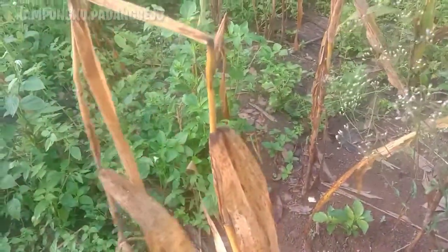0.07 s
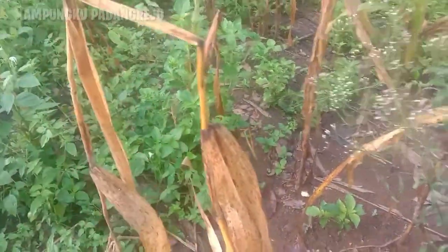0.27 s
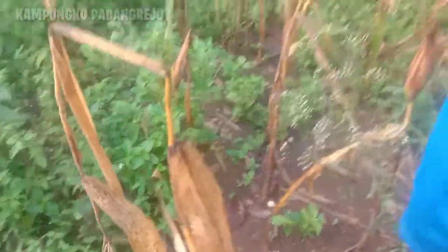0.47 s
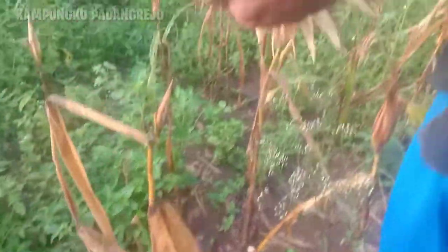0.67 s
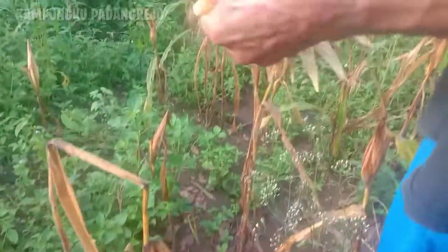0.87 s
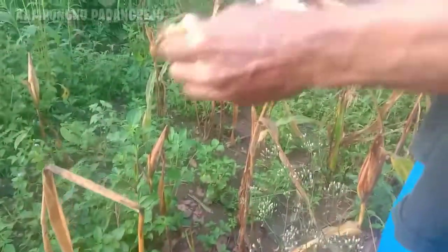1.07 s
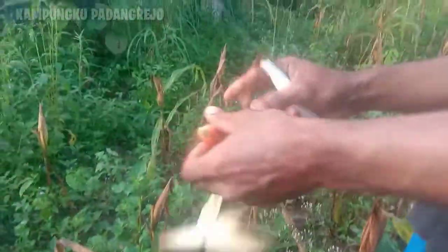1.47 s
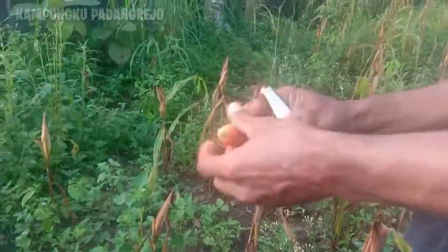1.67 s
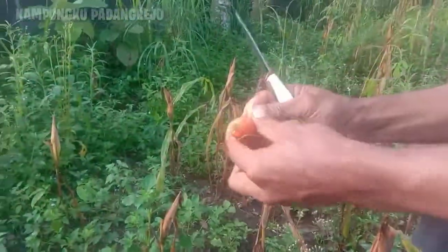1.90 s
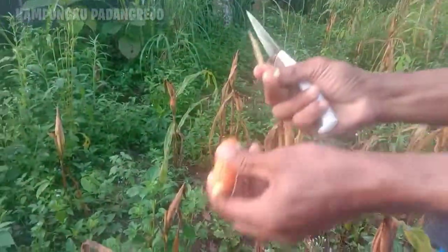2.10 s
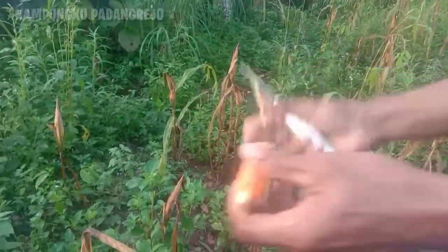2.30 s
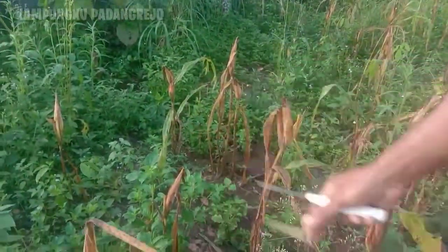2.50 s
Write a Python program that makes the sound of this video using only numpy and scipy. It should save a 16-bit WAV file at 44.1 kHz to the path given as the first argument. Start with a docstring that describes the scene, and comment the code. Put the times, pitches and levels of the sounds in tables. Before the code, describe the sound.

Dry corn husk is torn close up in a field, crackling from about 0.3 seconds. The loudest crack comes at 0.75 as the stalk gives, with another sharp snap at 1.0. A smaller snap and splintering tear follow around 1.7, then light knife ticks and sliding husk near 2.0. Behind are faint falling bird whistles, insects, a distant dove and fowl, and low microphone handling rumble.

```python
"""Dry corn husk, torn and snapped off a cob by hand, close up in a field.
Fibres break in sharp cracks and splinters, the stalk rings, leaves crackle and slide, a knife ticks.
A small bird whistles downward, insects shrill, a dove and a fowl call far off.
Under it: outdoor air and the rumble of a hand-held microphone."""
import sys
import numpy as np
from scipy import signal
from scipy.fft import rfft, irfft, next_fast_len
from scipy.io import wavfile

SR = 44100
rng = np.random.default_rng(int(sys.argv[2]) if len(sys.argv) > 2 else 0)


def dump(signal):
    """Clip the signal to [-1, 1] and save it as 16-bit WAV at the path in sys.argv[1]."""
    limited = np.clip(np.atleast_2d(signal).T, -1, 1)
    pcm = np.round(limited * 32767).astype(np.int16)
    wavfile.write(sys.argv[1], SR, pcm)


N = 116865
T = np.arange(N) / SR
GRID_HZ = np.fft.rfftfreq(4096, 1 / SR)
FIBRE_PEAK_DB, FIBRE_WIDTH_HZ = 10, 380

# Microphone port resonances: f/Hz, width/Hz, gain/dB
PORT_PEAKS = [(1270, 140, 6.5), (1850, 150, -3), (2300, 200, 2), (3000, 200, -2), (3750, 200, 2),
              (5850, 250, 3), (6570, 120, -4), (7350, 350, 4), (12700, 1200, -4), (15050, 500, 10)]
# Air envelope: t/s, level/dB
AIR_LEVEL = [(0, -56), (.25, -58), (.65, -62.5), (1.1, -58), (1.45, -62.5), (1.7, -58), (2.05, -60.5),
             (2.4, -58.5), (2.65, -60.5)]
# Air spectrum: f/Hz, level/dB
AIR_SPECTRUM = [(20, 19.5), (80, 7.5), (200, 14), (330, -0.5), (550, -5), (900, -12), (1300, -5),
                (2200, -14), (3000, -12), (4500, -17.5), (7000, -31.5), (9500, -15.5), (11000, -25),
                (16000, -29.5)]
# Faint midrange swells: t/s, half length/s, level/dB, f/Hz, width/Hz
AIR_SWELLS = [(1.3, 0.094, -66, 896, 604), (1.332, 0.1, -64, 1454, 506.2), (2.201, 0.22, -76, 685.5, 447),
              (2.275, 0.051, -59, 1536, 1080)]
# Stereo side noise spectrum: f/Hz, level/dB
SIDE_SPECTRUM = [(20, 6), (100, -30), (300, -2), (700, -4.5), (1300, -2), (3000, -4.5), (6000, -14.5),
                 (11000, -34), (16000, -10.5)]
# Handling rumble envelope: t/s, level/dB
RUMBLE_LEVEL = [(0.0, -40.5), (0.04, -52.5), (0.22, -43), (0.24, -38.5), (0.35, -30), (0.39, -51),
                (0.42, -30.5), (0.44, -46.5), (0.54, -32.5), (0.57, -34.5), (0.6, -28), (0.67, -38.5),
                (0.71, -29.5), (0.86, -40.5), (0.88, -50.5), (0.94, -35), (0.97, -54), (1.05, -34),
                (1.17, -43.5), (1.19, -59), (1.22, -40.5), (1.26, -58), (1.29, -37.5), (1.38, -31.5),
                (1.4, -38.5), (1.57, -45), (1.59, -69), (1.65, -37), (1.68, -59), (1.71, -38),
                (1.76, -32.5), (1.85, -38), (1.88, -63), (1.94, -40), (2.01, -55.5), (2.05, -38),
                (2.12, -40.5), (2.25, -63), (2.29, -62), (2.33, -39), (2.41, -31.5), (2.49, -50.5),
                (2.61, -44), (2.65, -69)]
# Rumble throb pitch: t/s, f/Hz
THROB_PITCH = [(0, 110.1), (.25, 76.64), (.31, 117.2), (.36, 122.5), (.41, 89.7), (.62, 82.04), (.7, 85.1),
               (.9, 77.16), (1.07, 85.9), (1.2, 69.7), (1.3, 101.5), (1.37, 79.8), (1.45, 67.16),
               (1.65, 69.1), (1.73, 106.8), (1.8, 70), (2.15, 69.15), (2.32, 120.4), (2.38, 78.14),
               (2.65, 75.4)]
# Rumble noise spectrum: f/Hz, level/dB
RUMBLE_SPECTRUM = [(20, -12), (35, -19), (55, 2), (120, 6), (160, -9), (200, -15), (300, -24), (500, -44),
                   (1000, -53), (4000, -101)]

# Insect chorus bands: f/Hz, width/Hz, level/dB
INSECT_BANDS = [(4750, 810, -0.5), (5730, 150, 0), (6210, 250, -3.5), (7080, 160, 0), (7400, 760, 0.5),
                (7230, 98, -2.5), (7500, 3400, 1.5), (9720, 330, -10)]
# Insect chorus envelope: t/s, level/dB
CHORUS_LEVEL = [(0, -75), (.2, -72), (.4, -62.5), (.68, -63.5), (.85, -68), (1.12, -59), (1.32, -60),
                (1.42, -71), (1.66, -74.5), (1.9, -68), (2.15, -66), (2.35, -65.5), (2.45, -76.5),
                (2.55, -69.5), (2.65, -71)]
# Dove coos: t/s, length/s, level/dB
DOVE_COOS = [(0.036, 0.12, -60.5), (0.603, 0.17, -64), (0.892, 0.25, -64), (1.164, 0.24, -65.5),
             (1.807, 0.13, -62)]
# Fowl calls: t/s, length/s, level/dB, start f/Hz, end f/Hz
FOWL_CALLS = [(0.057, 0.101, -64, 1300, 1252), (1.36, 0.089, -62, 1560, 1280),
              (1.845, 0.12, -60.5, 1230, 1200), (2.102, .1, -53.5, 1190, 1245),
              (2.213, 0.059, -56.5, 1570, 1529), (2.241, 0.114, -60, 1320, 1284),
              (2.539, 0.031, -60.5, 950, 1026), (2.569, 0.081, -55, 1190, 1289)]
# Near whistles: t/s, length/s, level/dB, start f/Hz, end f/Hz
BIRD_NEAR = [(.408, 0.046, -50.5, 5500, 4070), (.871, .082, -51.5, 5405, 3370),
             (1.379, .094, -51, 5482, 3165)]
# Far whistles: t/s, length/s, level/dB, start f/Hz, end f/Hz
BIRD_FAR = [(1.545, 0.073, -63, 5070, 4245), (1.60, 0.054, -63, 3560, 2470)]

# Early reflections off hands and husk: delay/s, linear gain
REFLECTIONS = [(.0006, 0.036), (.0032, 0.17)]
# Knife bites: t/s, level/dB, sigma/s, f/Hz
KNIFE_CUTS = [(1.954, -41, 0.0013, 7990), (1.9657, -31, 0.00062, 7990), (1.988, -33, 0.001, 7500),
              (2.0254, -39.5, 0.00081, 6070), (2.047, -40, 0.0014, 6640)]
# Husk-on-husk strokes: peak t/s, level/dB, rise/s, fall/s, fold f/Hz
SLIDE_STROKES = [(0.019, -56, 0.13, .11, 4250), (0.553, -50, 0.014, 0.015, 4150),
                 (2.026, -49, 0.027, 0.035, 4750), (2.059, -54, .025, 0.075, 3220),
                 (2.126, -50.5, 0.034, 0.069, 4150)]
# Sliding spectrum: f/Hz, level/dB
SLIDE_SPECTRUM = [(200, -88), (1900, -27), (2900, 3.5), (4200, -4), (5300, 4.5), (6300, 0), (8000, -4.5),
                  (10500, -40), (16000, -44)]
# Leaf strokes: peak t/s, level/dB, rise/s, fall/s, tilt/(dB/octave)
RUSTLE_STROKES = [(0.014, -54.5, 0.095, 0.016, -0.5), (0.111, -55.5, 0.023, 0.047, -1),
                  (0.243, -49.5, 0.0064, 0.055, 1.5), (0.286, -51, 0.029, 0.029, -0.5),
                  (0.489, -44, 0.031, 0.027, 0), (.562, -58.5, 0.095, 0.048, -2),
                  (.775, -45.5, 0.013, 0.037, 0), (0.804, -58, 0.0092, 0.0051, 7),
                  (0.944, -49, 0.0028, 0.0046, -2.5), (0.988, -44, 0.016, 0.015, 0.5),
                  (1.25, -39.5, 0.022, 0.019, 1), (1.317, -59.5, 0.018, 0.037, 2),
                  (1.718, -55.5, 0.017, 0.013, -1), (1.744, -45, 0.0032, 0.011, 5),
                  (1.757, -50.5, 0.012, 0.018, 0), (1.831, -59.5, 0.012, 0.026, 1),
                  (2.034, -57, 0.055, 0.018, 5.5)]
# Leaf spectrum: f/Hz, level/dB
RUSTLE_SPECTRUM = [(100, -53), (400, 0.5), (750, -11), (1300, -4), (2300, 1), (4000, 2.5), (6000, 2.5),
                   (8000, 0), (11000, -18), (16000, -15.5)]
# Stalk modes: f/Hz, level/dB, T60/s
STALK_MODES = [(810, -11.5, 0.038), (1303, 4.5, 0.035), (2310, -12.5, 0.023), (3560, -23.5, 0.01)]
# Stalk giving way: t/s, level/dB
STALK_KNOCKS = [(.7395, -39), (.7528, -36.5), (1.680, -55), (2.538, -55)]
# Hollow husk peaks and dips: f/Hz, width/Hz, gain/dB
HUSK_PEAKS = [(717, 44, 18), (2100, 990, -0.5), (2860, 77, -2), (4160, 210, 2.5), (4900, 840, -3),
              (6280, 620, -2.5)]
# Snap spectrum: f/Hz, level/dB
SNAP_SPECTRUM = [(100, 24.5), (400, -17), (750, -8), (1300, 4), (2300, 8), (4000, 8), (6000, 16),
                 (8000, 3.5), (11000, -7.5), (16000, -8)]
# Fibre breaks: t/s, level/dB, tilt/(dB/octave), splinter decay/s, splinter gain/dB, fibre f/Hz
FIBRE_SNAPS = [(.235, -53, 20, .004, -9, 5200), (0.249, -40, -6, 0.0054, -10, 3600),
               (0.284, -25, -0.5, 0.0057, -4, 2760), (0.3324, -15, -0.5, 0.0015, -6.5, 5400),
               (0.3692, -32, 13, 0.0034, 4.5, 7100), (0.38, -35, -1, .0014, 6, 4300),
               (0.4095, -22.5, -1, 0.016, 2, 5520), (.739, -2, 4.5, 0.0027, -6.5, 2150),
               (0.743, -19, 1.5, 0.0034, 2, 7300), (0.7482, -16, -0.5, 0.0017, 9, 6000),
               (0.752, -8.5, -3, 0.0036, 6.5, 3470), (.7555, -11.5, 1, 0.0026, -5, 3570),
               (0.9736, -26, 14, 0.0012, 2, 8610), (0.9764, -17, -1, 0.0023, -0.5, 5540),
               (1.0044, -5.5, -1.5, 0.001, -3, 4460), (1.0054, -20, -1.5, .0017, 0, 4600),
               (1.5226, -38, 1, 0.0088, 1.5, 3760), (1.6807, -16.5, -7.5, 0.0026, 0, 1276),
               (1.7086, -30.5, -2.5, 0.0012, 3, 1270), (1.7107, -26.5, 15, 0.01, -0.5, 7140),
               (1.7505, -22, 2, 0.033, -4.5, 4770), (1.8195, -30.5, -1, 0.0032, 6.5, 4548)]


def amp(db):
    """Decibels to gain."""
    return 10 ** (np.asarray(db) / 20)


def unit(x):
    """Scale to rms 1."""
    return x / np.sqrt(np.mean(x ** 2) + 1e-20)


def add(mix, at_s, sound):
    """Mix in at at_s."""
    part = mix[max(round(at_s * SR), 0):][:len(sound)]
    part += sound[:len(part)]


def curve(points):
    """Breakpoints interpolated over T."""
    return np.interp(T, *np.transpose(points))


def sine(hz):
    """Sine along a pitch track, peak 1."""
    return np.sin(2 * np.pi * np.cumsum(hz) / SR)


def spectrum(points):
    """Breakpoints to dB on GRID_HZ."""
    hz, db = np.transpose(points)
    return np.interp(np.log(GRID_HZ + 1), np.log(hz), db)


def peaks(rows):
    """Gaussian peaks and dips in dB on GRID_HZ."""
    return sum(db * np.exp(-((GRID_HZ - hz) / width_hz) ** 2) for hz, width_hz, db in rows)


def colour(x, shape_db):
    """Minimum-phase filter of unit energy: shape_db plus the microphone port."""
    cepstrum = irfft(np.log(amp(shape_db + peaks(PORT_PEAKS))))
    cepstrum[1:len(GRID_HZ) - 1] *= 2
    cepstrum[len(GRID_HZ):] = 0
    taps = irfft(np.exp(rfft(cepstrum)))
    return signal.fftconvolve(x, taps / np.linalg.norm(taps))[:len(x)]


def drift(rate_hz):
    """Low-passed noise, rms 1."""
    size = next_fast_len(N, True)
    lowpass = np.exp(-(np.fft.rfftfreq(size, 1 / SR) / rate_hz) ** 2)
    return unit(irfft(rfft(rng.standard_normal(size)) * lowpass, size)[:N])


def noise_band(hz, width_hz):
    """Narrowband noise, rms 1."""
    phase = 2 * np.pi * hz * T
    return drift(width_hz / 2) * np.cos(phase) + drift(width_hz / 2) * np.sin(phase)


def grains(per_s, spread_db):
    """Random clicks of uneven size, rms 1."""
    size = amp(spread_db * np.minimum(rng.exponential(1, N), 4))
    return unit(size * np.sign(rng.standard_normal(N)) * (rng.random(N) < per_s / SR))


def strokes(rows):
    """Hand stroke envelope: exponential rises and falls, summed in power."""
    t = T[::32]
    power = sum((amp(db) * np.exp(-np.maximum((at_s - t) / rise_s, (t - at_s) / fall_s))) ** 2
                for at_s, db, rise_s, fall_s in rows)
    return np.interp(T, t, np.sqrt(power))


def scatter(x, t60_s):
    """Diffuse echoes off the plants."""
    t = T[:SR // 2]
    tail = rng.standard_normal(len(t)) * np.exp(-np.log(1000) * t / t60_s)
    return signal.fftconvolve(x, tail / np.linalg.norm(tail))[:N]


def air():
    """Outdoor noise with faint midrange swells."""
    bed = amp(curve(AIR_LEVEL)) * colour(rng.standard_normal(N), spectrum(AIR_SPECTRUM))
    swells = sum(amp(db) * np.exp(-((T - at_s) / half_s) ** 2) * noise_band(hz, width_hz)
                 for at_s, half_s, db, hz, width_hz in AIR_SWELLS)
    return bed + swells


def rumble(wander=0.035, throb_db=-2, noise_db=-8):
    """Handling shakes the microphone: wandering low throb plus noise."""
    throb = np.sqrt(2) * sine(curve(THROB_PITCH) * (1 + wander * drift(22)))
    noise = colour(rng.standard_normal(N), spectrum(RUMBLE_SPECTRUM))
    return amp(curve(RUMBLE_LEVEL)) * (amp(throb_db) * throb + amp(noise_db) * noise)


def insects():
    """Many distant insects merge into shrill bands."""
    chorus = sum(amp(db) * noise_band(hz, width_hz) for hz, width_hz, db in INSECT_BANDS)
    return amp(curve(CHORUS_LEVEL)) * unit(chorus)


def dove(pitch_hz=463, waver=0.03):
    """Soft coos on one wavering pitch."""
    level = sum(amp(db) * np.sin(np.pi * np.clip((T - at_s) / length_s, 0, 1))
                for at_s, length_s, db in DOVE_COOS)
    return level * np.sqrt(2) * sine(pitch_hz * (1 + waver * drift(28)))


def fowl(waver=0.022, edge_s=0.015):
    """Distant hoarse notes, half echo."""
    out = np.zeros(N)
    for at_s, length_s, db, start_hz, end_hz in FOWL_CALLS:
        t = T[:int(length_s * SR)]
        hz = (start_hz + (end_hz - start_hz) * t / length_s) * (1 + waver * drift(150)[:len(t)])
        gate = np.clip(np.minimum(t, length_s - t) / edge_s, 0, 1)
        add(out, at_s, amp(db) * gate * sine(hz))
    return out + scatter(out, t60_s=0.25)


def whistles(rows, hold_share=0.13, edge_s=0.009, fade_db=-21, warble=0.012, flutter_db=3):
    """Fluttering notes: hold the top pitch, then fall and fade."""
    out = np.zeros(N)
    for at_s, length_s, db, start_hz, end_hz in rows:
        t = T[:int(length_s * SR)]
        glide = np.clip((t / length_s - hold_share) / (1 - hold_share), 0, 1)
        hz = start_hz * (end_hz / start_hz) ** glide * (1 + warble * drift(260)[:len(t)])
        gate = np.clip(np.minimum(t, length_s - t) / edge_s, 0, 1)
        level = amp(db + fade_db * glide + flutter_db * drift(120)[:len(t)])
        add(out, at_s, gate * level * np.sqrt(2) * sine(hz))
    return out


def bird(echo_db=1.5):
    """Whistles smeared by echoes; far ones arrive as echo only."""
    near = whistles(BIRD_NEAR)
    return near + amp(echo_db) * scatter(near + whistles(BIRD_FAR), t60_s=0.39)


def close_echoes(direct, leaves_db=-7):
    """Direct sound, reflections off hands and husk, short scatter off leaves."""
    early = direct.copy()
    for delay_s, gain in REFLECTIONS:
        add(early, delay_s, gain * direct)
    return early + amp(leaves_db) * scatter(early, t60_s=0.056)


def knife(width_octaves=0.22, skirt_db=-14.5):
    """The blade parts fibres in short bright rasps."""
    out, t = np.zeros(N), T[:2048]
    lead_s = t[256]
    skirt = amp(skirt_db) * (GRID_HZ + 100) / (GRID_HZ + 2000)
    for at_s, db, sigma_s, hz in KNIFE_CUTS:
        rasp = rng.standard_normal(len(t)) * np.exp(-((t - lead_s) / sigma_s) ** 2 / 2)
        band = np.exp(-(np.log2((GRID_HZ + 1) / hz) / width_octaves) ** 2)
        add(out, at_s - lead_s, amp(db) * colour(rasp, 20 * np.log10(band + skirt)))
    return out


def slides(judder_db=0.5, judder_hz=91.5):
    """Husk drags over husk in tiny catches; each stroke rings at its fold's pitch."""
    out = np.zeros(N)
    for at_s, db, rise_s, fall_s, fold_hz in SLIDE_STROKES:
        catches = grains(per_s=5000, spread_db=2.5)
        level = strokes([(at_s, db, rise_s, fall_s)]) * amp(-judder_db * drift(judder_hz))
        fold_db = peaks([(fold_hz, FIBRE_WIDTH_HZ, FIBRE_PEAK_DB)])
        out += colour(catches * level, spectrum(SLIDE_SPECTRUM) + fold_db)
    return out


def rustle(clump_db=1.6, clump_hz=200, flicker_db=3, flicker_hz=90):
    """Leaves crackle in clumps; folds favour different pitches, so each band flickers alone."""
    crackle = unit(grains(per_s=7000, spread_db=3.5) * amp(clump_db * drift(clump_hz)))
    bins = rfft(crackle, 2 * (N // 2 + 1))
    bin_hz = np.linspace(0, SR / 2, len(bins))
    bands_hz = np.geomspace(700, 14000, 14)
    out = np.zeros(N)
    for hz, weights in zip(bands_hz, np.eye(len(bands_hz))):
        band = irfft(bins * np.interp(bin_hz, bands_hz, weights))[:N]
        level = strokes([(at_s, db + tilt * np.log2(hz / 5000), rise_s, fall_s)
                         for at_s, db, rise_s, fall_s, tilt in RUSTLE_STROKES])
        out += band * level * unit(amp(flicker_db * drift(flicker_hz)))
    return colour(out, spectrum(RUSTLE_SPECTRUM))


def stalk():
    """Short woody ring as the stalk gives way."""
    out, t = np.zeros(N), T[:4096]
    ring = sum(amp(db - 60 * t / t60_s) * np.sin(2 * np.pi * hz * t) for hz, db, t60_s in STALK_MODES)
    for at_s, db in STALK_KNOCKS:
        add(out, at_s, amp(db) * ring)
    return out


def snaps(crack_s=0.00035, ragged_gain=0.75, highpass_hz=480):
    """Fibres break: one hard, ragged crack, then a dying shower of splinters."""
    out, t = np.zeros(N), T[:4096]
    husk_db = spectrum(SNAP_SPECTRUM) + peaks(HUSK_PEAKS)
    octaves = np.log2(np.clip(GRID_HZ, 500, 9000) / 4000)
    for at_s, db, tilt, decay_s, splinter_db, fibre_hz in FIBRE_SNAPS:
        shower = grains(per_s=14000, spread_db=2.5)[:len(t)] * np.exp(-t / decay_s)
        crack = rng.standard_normal(len(t)) * t * np.exp(-2 * t / crack_s)
        force = amp(splinter_db) * shower / (np.linalg.norm(shower) + 1e-9)
        force += ragged_gain * crack / np.linalg.norm(crack)
        force[round(crack_s * SR / 2)] -= np.sqrt(1 - ragged_gain ** 2)  # impulse at the crack's peak
        fibre_db = peaks([(fibre_hz, FIBRE_WIDTH_HZ, FIBRE_PEAK_DB)])
        add(out, at_s, amp(db) * colour(force, husk_db + fibre_db + tilt * octaves))
    highpass = signal.butter(2, highpass_hz, "highpass", fs=SR)  # thin fibres radiate no bass
    return signal.lfilter(*highpass, out)


def scene(side_db=-82):
    """All sources centred; faint side noise adds width."""
    husk = close_echoes(snaps() + stalk() + rustle() + slides() + knife())
    mid = husk + bird() + fowl() + dove() + insects() + air() + rumble()
    side = amp(side_db) * colour(rng.standard_normal(N), spectrum(SIDE_SPECTRUM))
    return np.array([mid + side, mid - side])


def record(dry):
    """Band limit: linear-phase low-pass."""
    cutoff_hz = 15650
    taps = signal.firwin(201, cutoff_hz, window=("kaiser", 8), fs=SR)
    return signal.oaconvolve(dry, taps[None], "same")


dry = scene()
out = record(dry)
dump(out)
```